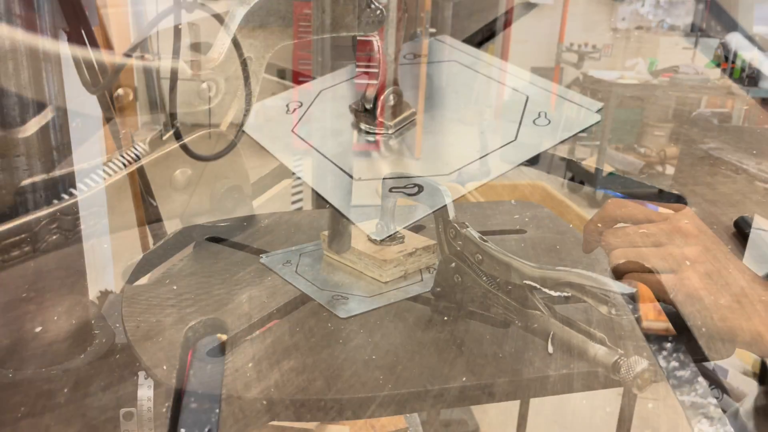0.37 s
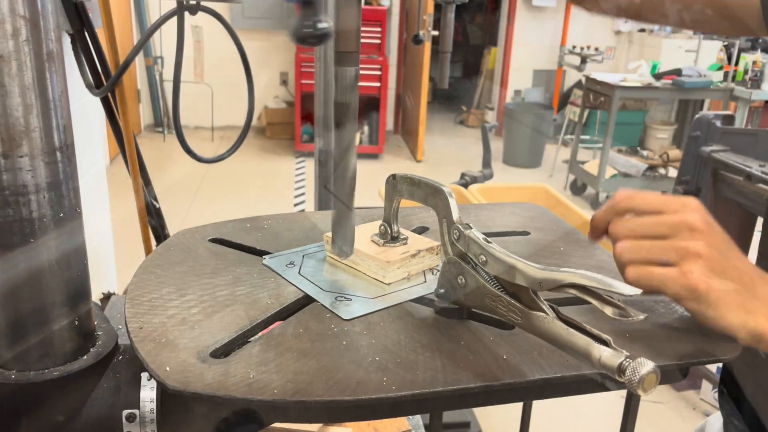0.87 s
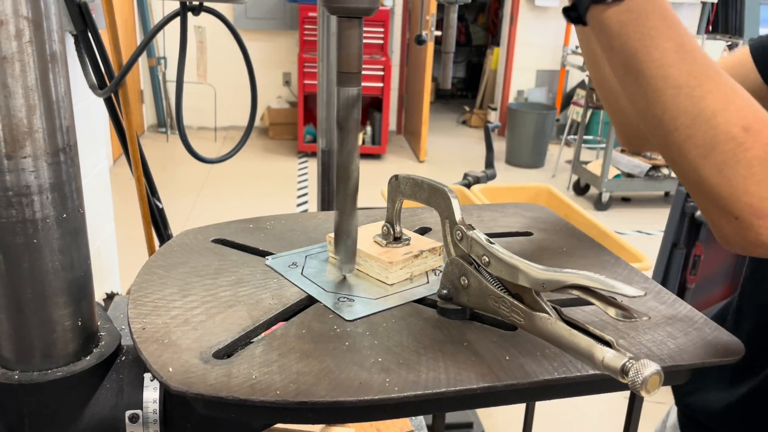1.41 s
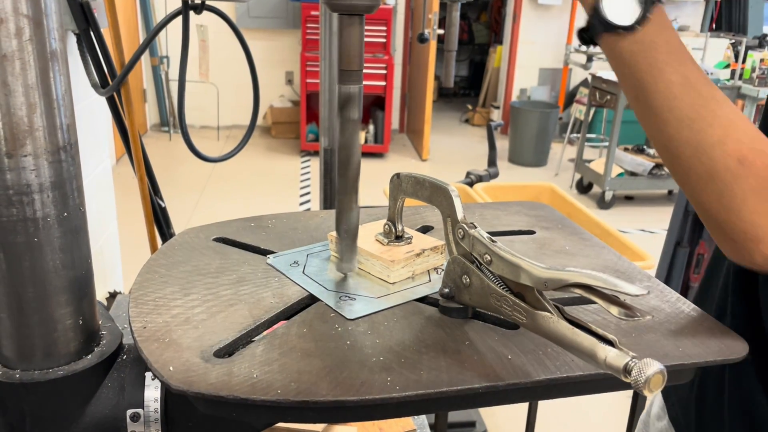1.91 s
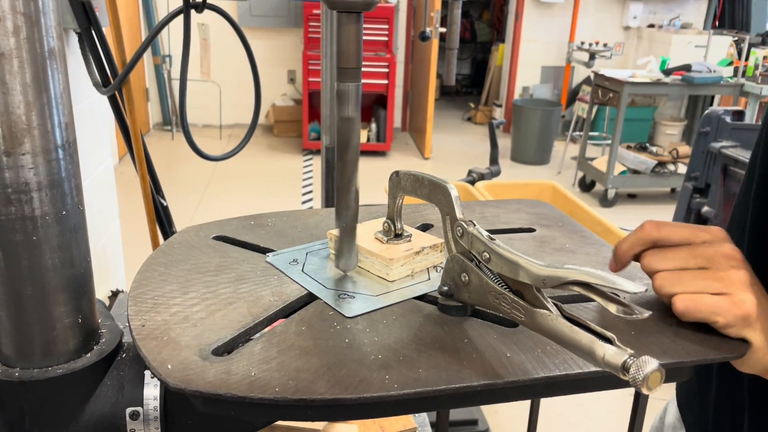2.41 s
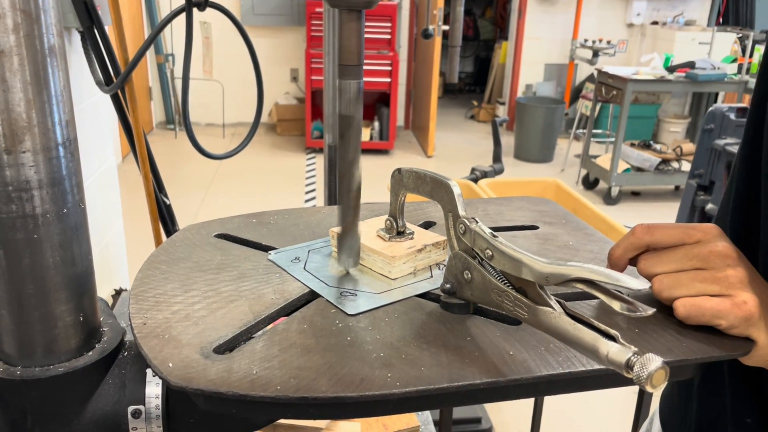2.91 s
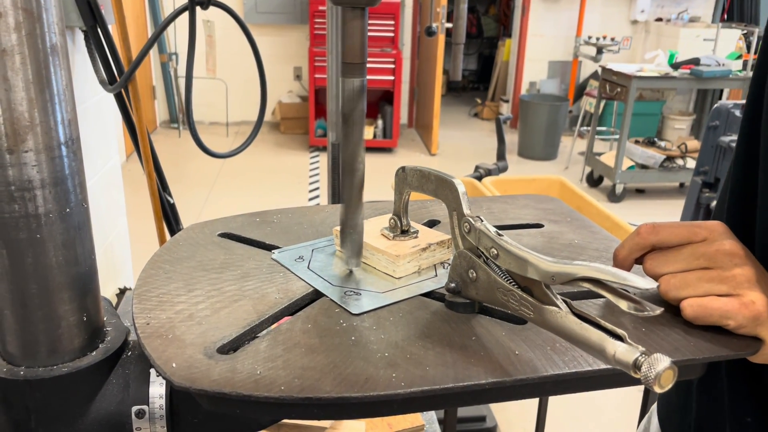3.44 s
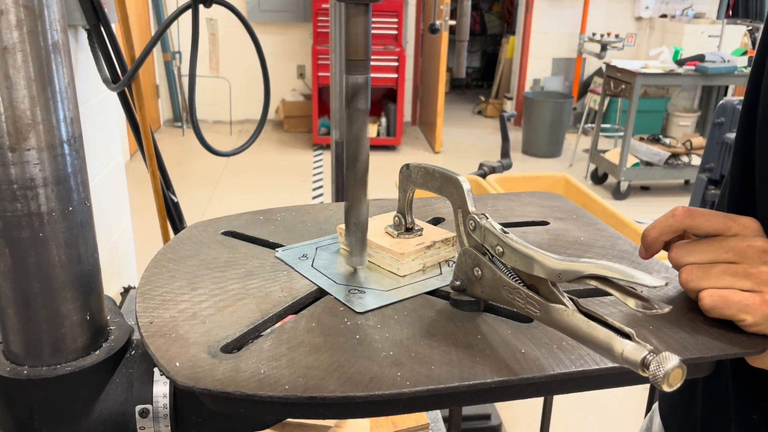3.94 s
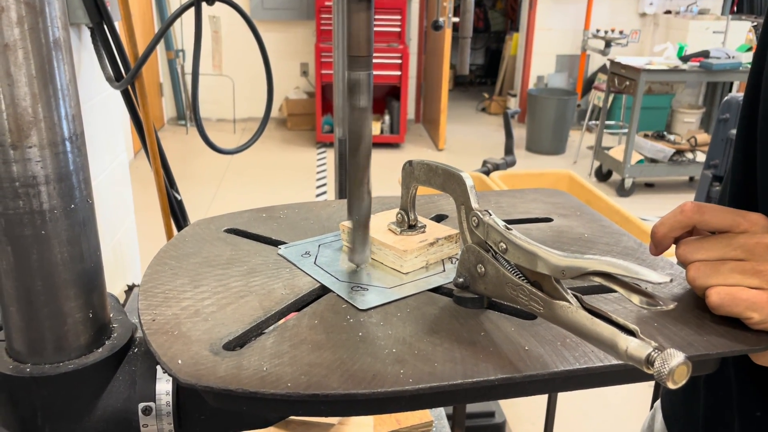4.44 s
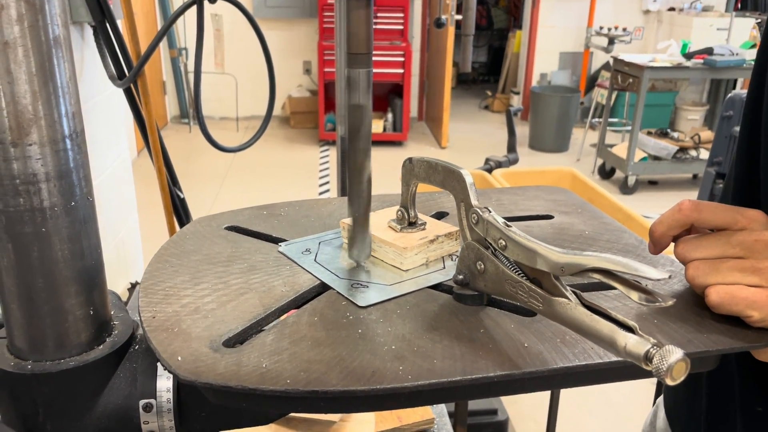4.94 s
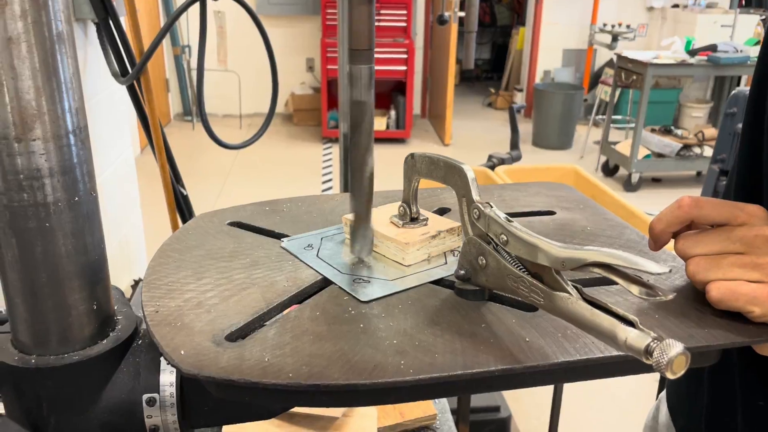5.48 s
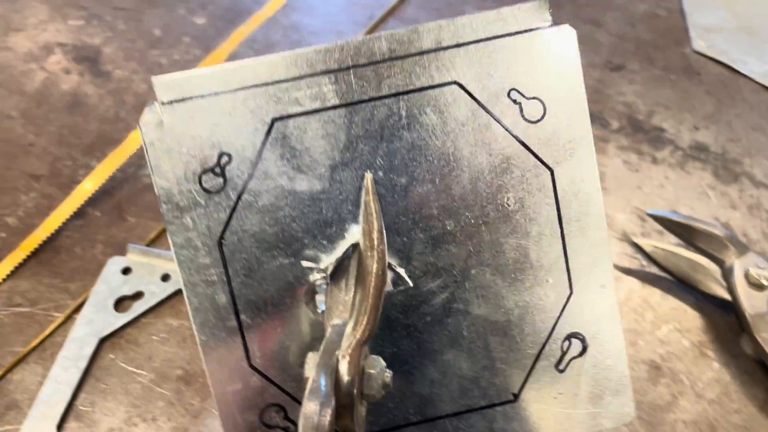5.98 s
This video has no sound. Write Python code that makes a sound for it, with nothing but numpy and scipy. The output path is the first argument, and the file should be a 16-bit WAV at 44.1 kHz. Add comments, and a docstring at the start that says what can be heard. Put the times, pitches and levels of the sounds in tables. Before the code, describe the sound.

A workshop drill press fades up, humming, rumbling and chattering through sheet steel, then cuts off short to a bright metallic scrape in a quiet room.

```python
"""In a workshop a drill press swells in, feeds a large bit into thin sheet metal and is cut off short.
The cast body and table resonate under noise, motor and drive sound as tones, a loose part buzzes by
impacts at the hum rate, and the bit chatters in bursts of band noise. At the start a clamp clanks twice
as decaying modes, among small ticks; at the end a metallic scrape, noise through moving resonances,
sounds in the quiet shop. Two close microphone ports receive it all."""
import sys
import numpy as np
from scipy import signal
from scipy.fft import rfft, irfft
from scipy.io import wavfile
from scipy.ndimage import uniform_filter1d

SR = 44100
rng = np.random.default_rng(int(sys.argv[2]) if len(sys.argv) > 2 else 0)


def wrap_up_sound(samples):
    """Save the sound to the file named by the first command line argument, as 16-bit audio."""
    columns = np.atleast_2d(samples).T
    # keep every value between -1 and 1, then stretch to whole-number steps
    tamed = np.clip(columns, -1, 1)
    steps = np.round(tamed * 32767).astype(np.int16)
    wavfile.write(sys.argv[1], SR, steps)


def ratio_of_db(decibels):
    """Turn decibels (scalar or array-like) into linear amplitude factors; 0 dB maps to 1."""
    return 10 ** (np.asarray(decibels, float) / 20)


N = 269010
TIME, HZ = np.arange(N) / SR, np.fft.rfftfreq(N, 1 / SR)

# Ventilation noise spectrum: f/Hz, relative level/dB
AIR_SPECTRUM = [(30, -20), (70, -2.5), (150, 1), (340, 1.5), (1000, -12), (1700, -15.5), (3100, -22),
                (4500, -28), (5500, -36), (8000, -33), (10000, -43), (15500, -50)]
# Decay of the shop's reverberation: band centre f/Hz, t60/s
ROOM_DECAY = [(500, 0.48), (2000, 0.54), (5000, 0.67), (10000, 0.11)]
# Small clicks and taps: t/s, relative level/dB, ring f/Hz, share of sharp click
TICKS = [(0.001, -30, 2400, 0.13), (.213, -41, 4900, .05), (0.256, -23, 1510, 0.06),
         (.307, -40, 3780, 0.12), (0.397, -24, 6140, .13), (.431, -42, 4200, 0.43),
         (0.473, -21.5, 5900, 0.1), (0.491, -29, 2440, .02), (.851, -34, 5800, .2),
         (0.8703, -22, 4670, 0.52), (.877, -33, 5800, .3), (1.008, -38, 6000, .6), (1.025, -40, 5800, .6),
         (1.018, -44, 6000, 0.65), (1.034, -37, 5500, .43), (1.057, -38, 7000, .6), (1.11, -39, 7000, .6),
         (1.755, -37, 7000, .6), (1.992, -36, 7500, .5), (2.092, -38.5, 9500, .6), (2.127, -36, 6300, 0.45),
         (2.342, -38, 5040, .6), (2.44, -42, 7000, .6), (2.585, -40, 9500, .5), (5.58, -47, 3900, .1),
         (5.65, -50, 4600, .15), (5.69, -44, 1200, .1), (5.71, -47, 4500, 0.36), (6.064, -28, 1140, .01)]
# Clamp blows: t/s, relative level/dB, factor on the ring time, delay until the grip damps it/s
CLAMP_BLOWS = [(.0092, -10, 0.96, 0.08), (0.3448, -12, 0.97, 0.066)]
# Clamp modes: f/Hz, t60/s before the blow's factor, level/dB in first blow, level/dB in second
CLAMP_MODES = [(1183, .05, -18, 6), (1285, 0.021, 10.5, -12), (1390, 0.017, -21, 22), (1700, 0.18, -24, 1),
               (1806, 0.056, -8, -8), (1960, 0.11, -9, -10), (2100, 0.099, -12, -9), (2300, .12, -18, -11),
               (2404, 0.14, 0.5, -4), (2515, 0.15, -7, -16), (2743, 0.15, -6, -23), (2780, 0.046, -5, 10),
               (2790, 0.058, -6, -25), (3160, 0.073, -0.5, 3.5), (3410, 0.079, -7, 3),
               (3620, 0.17, -15, -15), (3670, 0.073, -16, 8.5), (4012, 0.054, -5, 2.5),
               (4200, .1, -24, -22), (4339, 0.1, -16, -1), (4420, .05, -11, -3), (4720, 0.11, -14, -22),
               (5160, 0.07, -9, -22), (5280, 0.091, -18, -6), (5550, 0.069, -15, -7),
               (6580, 0.1, -17, -3.5), (7150, 0.06, -10, -0.5)]
# Scrape stroke: t/s, pressure level/dB, rasp f/Hz, which sinks with the speed
SCRAPE_STROKE = [(5.572, -70, 2450), (5.59, -61, 2450), (5.64, -67, 2450), (5.706, -62, 2450),
                 (5.714, -47, 2400), (5.745, -38.5, 2400), (5.76, -35, 2430), (5.785, -33, 2380),
                 (5.8, -35.5, 2300), (5.83, -33.5, 1950), (5.855, -37, 1840), (5.88, -43, 1850),
                 (5.92, -44, 1980), (6.02, -49, 2020), (6.035, -57, 2050), (6.1, -55, 2050)]
# Spectrum of metal sliding on metal: f/Hz, relative level/dB
SCRAPE_SPECTRUM = [(300, 2), (600, -3.5), (1100, -3), (1900, -2.5), (2600, -2.5), (3600, -2), (4600, -4),
                   (5600, -4.5), (8000, -11.5), (10500, -11.5), (12500, -16), (15500, -27)]
# Modes of the scraped thin sheet: f/Hz, width/Hz, relative level/dB
SHEET_MODES = [(820, 350, 2.5), (1244, 71, 2.5), (1800, 60, 1), (2060, 35, -1), (2210, 30, 1),
               (2490, 35, -3), (2640, 80, -3), (2910, 35, -3), (3110, 55, -1), (3780, 45, -11),
               (4620, 200, -3.5)]
# Spells of the loose part rattling: t/s, length/s, level/dB
BUZZ_SPELLS = [(1.253, .73, -49), (2.23, .02, -52), (2.275, .03, -51), (2.326, .05, -52), (2.43, .025, -50),
               (2.9, 0.027, -50)]
# Modes of the loose part: f/Hz, relative level/dB, t60/s
LOOSE_MODES = [(4120, -1, 0.0097), (4450, -5, 0.017), (5810, -6.5, 0.019), (7900, -1, 0.013),
               (9080, 1, 0.008), (10200, -9, .003), (10900, -1, 0.003), (11750, 2, 0.0051),
               (12400, 3, 0.003), (13700, -1, 0.0033), (15200, -16, .003)]
# Tones of rotor and belt drive: f/Hz, level/dB in light cutting
DRIVE_TONES = [(59.2, -57.5), (118.4, -47), (211, -40), (328.4, -40.5), (446.8, -49)]
# Rumble spectrum of belts and bearings: f/Hz, relative level/dB
RUMBLE_SPECTRUM = [(24, -43), (40, -35), (65, -12.5), (86, -17), (102, -4), (168, -7.5), (255, -6),
                   (319, -4), (345, -6.5), (450, -4.5), (470, -6.5), (584, -4.5), (695, -12), (916, -11),
                   (1070, -18.5), (1190, -14.5), (1650, -26.5), (2500, -39), (3250, -50), (5500, -120)]
# Resonances of head, column and table: f/Hz, width/Hz, level over the rumble/dB
CASTING_MODES = [(386, 8.6, 3), (405, 33, -5.5), (432, 17, -6), (585, 13.4, 0.5), (771, 12, 5.5),
                 (869, 8.7, 5.5), (921, 19, 6.5), (997.5, 21, 6.5), (1167, 24, 6.5), (1466, 25, 8.5),
                 (1888, 74, 13)]
# Table modes: free f/Hz, hard-pressed f/Hz, free width/Hz, relative level/dB
TABLE_MODES = [(104.6, 104, 11, -9), (167, 150, 43, -6), (209, 212, 6.5, 0.5), (220, 223, 10.2, 2),
               (277, 267, 8.9, -4), (298.5, 286, 16, -1), (327, 318.3, 19.6, -1.5)]
# Spectrum of the grinding bit: f/Hz, relative level/dB
GRIND_SPECTRUM = [(900, -0.5), (1700, 0.5), (2400, -3.5), (3100, -5), (4500, -9), (5500, -8), (7500, -13),
                  (9500, -13.5), (11000, -19), (13500, -24), (15500, -29)]
# Modes of the sheet under the bit: f/Hz, width/Hz, level over the grinding/dB
CLAMPED_MODES = [(2030, 21, 6), (2420, 12.4, 9), (2840, 9.6, 11.5), (3320, 16, 9.5), (4230, 18, 10),
                 (4555, 81, 5)]
# The bit catching an edge: t/s, relative level/dB, centre f/Hz
CATCHES = [(.572, -41, 1500), (0.7434, -26, 3300), (0.869, -25.5, 4080), (.972, -28, 2600),
           (1.028, -26, 3110), (1.138, -20.5, 2490), (1.2418, -24.5, 2860), (1.335, -31, 2800),
           (1.4073, -30, 2800), (1.433, -32, 2500), (1.476, -23.5, 2460), (1.5096, -21, 2400),
           (1.572, -25.5, 2500), (1.6085, -24, 2520), (1.6362, -28, 3300), (1.671, -25, 3040),
           (1.7445, -25, 3000), (1.799, -24, 2900), (1.877, -26.5, 2780), (2.012, -23, 2420),
           (2.046, -28, 3000), (2.118, -30, 2200), (2.244, -24, 2780), (2.27, -26.5, 2000),
           (2.3511, -39, 2500), (2.415, -26, 2300), (2.4745, -28, 2910), (2.5073, -27.5, 3450),
           (2.523, -24, 1900), (2.614, -20, 3150), (2.728, -35, 1500), (2.802, -21.5, 2290),
           (2.871, -30, 2400), (2.953, -29, 2000), (3.0535, -27, 2000), (3.111, -23, 2500),
           (3.1837, -24.5, 2000), (3.2574, -24, 2810), (3.3799, -23, 2810), (3.483, -28, 2900),
           (3.642, -34, 2000), (3.6926, -38, 2000), (3.746, -28, 1500), (3.762, -26, 1900),
           (3.808, -24, 3480), (4.024, -25, 2720), (4.097, -27, 2400), (4.4689, -26, 3070),
           (4.518, -21, 1700), (4.5606, -31, 1800), (4.595, -24.5, 1800), (4.725, -24, 2300),
           (4.8372, -30, 2400), (4.906, -25, 1500), (4.928, -31, 1700), (4.948, -21, 1700),
           (4.984, -25, 2300), (5.1203, -27, 2900), (5.2045, -18.5, 1700), (5.346, -18.5, 1700)]
# Hand on the feed lever: t/s, table load level/dB, bite level/dB, both against light cutting
FEED = [(.3, -3, 1), (.62, -2.5, -1.5), (.8, -6, 0.5), (1.5, 1, 0.5), (1.93, -3.5, -1), (2.05, 4, -1.5),
        (2.4, 2.5, 1.5), (2.65, -0.5, 0.5), (3.55, -2.5, -0.5), (3.75, 6, 4), (4.1, 3, 3), (4.5, 8, 3.5),
        (4.8, 3, 5), (5, 7.5, 4.5), (5.5, 6, 5)]
# Likeness of the two ports: f/Hz, share common to both
LIKENESS = [(30, 0.58), (100, 0.99), (340, 0.95), (1000, 0.78), (1700, 0.34), (2800, 0.44), (5200, 0.26),
            (5900, 0.71), (7300, 0.2), (7700, 1), (9050, 0.71), (9500, 0.096), (10500, 0.91), (16000, 0.75)]
# Phase of the right port against the left: f/Hz, half-turns
PORT_PHASE = [(0, 0), (1000, -.17), (1700, -.4), (2700, -.25), (4100, .1), (5000, -.1), (6000, .1),
              (7000, .55), (7600, 1), (9000, 1), (10400, 2), (12500, 2), (13600, 3), (22050, 3)]
# Left port over right port: f/Hz, level/dB
PORT_LEVEL = [(60, 1.1), (300, .7), (700, 2), (1700, 0), (4500, 3), (6500, 1), (7600, 0), (16000, 0)]

AIR_DB, MAINS_DB = (-39, -44.5), (-46.5, -48)  # before and after the press
SHOP_BACK_S, MAINS_UNDER_PRESS_DB = 0.018, -57  # rise time of the quiet shop after the cut
FADE_IN_S, FADE_IN_POWER = 0.8, 1.29
CUT_S = 5.509, 5.568  # the press sound fades out between these times
TICK_CYCLES, TICK_Q = 71, 4  # cycles down to -60 dB; sharpness of the noise band
BOUNCE_S, BOUNCE_DB = 0.0085, -15.5  # the jaws rebound once
CLATTER_DB, CLATTER_T60_S = -20, 0.06
GRIP_DB_PER_S, RISE_CYCLES = 900, 1.98  # extra decay once damped; build-up of a clamp mode
SLOW_HZ, SLOW_TREBLE_DB, TREBLE_DB_PER_OCTAVE = 1900, -6, 21.5  # a faster stroke is brighter
SQUEAL_DB, SQUEAL_RATIO = 1, 1.9  # upper rasp: level before the brightness, ratio to the lower
LINGER_HZ, LINGER_WIDTH_HZ, LINGER_DB = 2070, 16, 9.2  # longest-ringing mode of the sheet
HUM_HZ = 119.74
BUZZ_RISE_S, BUZZ_FALL_DB_PER_S = 0.019, 300
RUMBLE_DB, TABLE_DB, GRIND_DB, HUM_DB = -28, -30.5, -46, -34.5  # in light cutting
RUMBLE_PER_BITE, HUM_PER_LOAD, WHINE_PER_LOAD = 0.39, -0.17, 0.48  # dB for each dB of feed
WHINE_DRIFT_RAD, WHINE_WAVER_DB = 0.6, 2.0  # rms
HARD_LOAD_DB = 7  # here the pressed table modes have wholly replaced the free ones
CHATTER_PER_S, CHATTER_DB = 60, -4.5  # mean rate of small catches; level relative to GRIND_DB
CATCH_T60_S = 0.11
SHUDDER_PER_S, SHUDDER_DB = 24, 0.74  # the whole frame shudders together
EDGE_HZ = 15850  # nothing above this reaches the ports' output


def evened(x):
    """Normalisation: scales a signal to rms 1."""
    return x / np.sqrt(np.mean(x ** 2) + 1e-20)


def read(points):
    """Interpolation of a spectrum along a logarithmic frequency axis."""
    f, value = np.transpose(points)
    return np.interp(np.log(HZ + 1), np.log(f + 1), value)


def level(rows, column=1):
    """Envelope: a dB column as gain over time, held at its ends."""
    rows = np.transpose(rows)
    return ratio_of_db(np.interp(TIME, rows[0], rows[column]))


def peaks(modes):
    """Modal superposition: the power sum of resonance curves, as gain."""
    return np.sqrt(sum(ratio_of_db(db) ** 2 / (1 + (2 * (HZ - hz) / width) ** 2) ** 2
                       for hz, width, db in modes))


def coloured(x, gain):
    """Linear filtering in the frequency domain, normalised to rms 1."""
    return evened(irfft(rfft(x) * gain, N))


def wobble(per_s):
    """Low-pass noise: slow random variation up to the given rate."""
    return coloured(rng.standard_normal(N), 1 / (1 + (HZ / per_s) ** 4))


def rough_noise(per_s, depth_db):
    """Amplitude modulation: two unrelated noises share one fluttering level."""
    return rng.standard_normal((2, N)) * ratio_of_db(depth_db * wobble(per_s))


def ring(modes, size=9000):
    """Free vibration: the exponentially dying sines of a struck body."""
    t = TIME[:size]
    return sum(ratio_of_db(db - 60 * t / t60) * np.sin(2 * np.pi * hz * t + rng.uniform(0, 0.52))
               for hz, db, t60 in modes)


def glide(x, hz, width):
    """Heterodyne resonator: shifts a moving frequency to zero, smooths there and shifts back."""
    turn = np.exp(2j * np.pi * np.cumsum(hz) / SR)
    r = np.exp(-np.pi * width / SR)
    return 2 * (turn * signal.lfilter([1 - r], [1, -r], x / turn)).real


def add(mix, s, sound):
    """Superposition: adds a sound in place at a time in seconds."""
    part = mix[..., round(s * SR):][..., :sound.shape[-1]]
    part += sound[..., :part.shape[-1]]


def scattered(x, t60):
    """Scattering: a sound and its diffuse copy off nearby surfaces."""
    tail = rng.standard_normal(6000) * ratio_of_db(-60 * TIME[:6000] / t60)
    return np.array([x, signal.fftconvolve(x, tail / np.linalg.norm(tail))[:N]])


def reverberated(x):
    """Reverberation: two unrelated room tails, each band decaying at its own rate."""
    t, out = TIME[:SR // 2], np.zeros((2, N))
    for hz, t60 in ROOM_DECAY:
        band = signal.butter(N=2, Wn=[hz / 1.6, hz * 1.6], btype="band", fs=SR, output="sos")
        tail = signal.sosfilt(band, rng.standard_normal((2, len(t))))
        tail = tail * ratio_of_db(-60 * t / t60) * np.minimum(t / 0.0066, 1)
        out += signal.fftconvolve(x[None], tail, axes=1)[:, :N]
    return out / np.sqrt(SR / 40)


def faded_in():
    """Power-law envelope: 0 to 1 as the press swells in."""
    return np.minimum(TIME / FADE_IN_S, 1) ** FADE_IN_POWER


def shop():
    """Stationary background: broadband ventilation noise and mains hum with its second harmonic."""
    before = 1 - faded_in()
    after = np.clip((TIME - CUT_S[1]) / SHOP_BACK_S, 0, 1) ** 1.5
    air = coloured(rough_noise(30.0, 0.57), ratio_of_db(read(AIR_SPECTRUM)))
    air = air * (ratio_of_db(AIR_DB[0]) * before + ratio_of_db(AIR_DB[1]) * after)
    mains = ratio_of_db(MAINS_DB[0]) * before + ratio_of_db(MAINS_DB[1]) * after
    mains = mains + ratio_of_db(MAINS_UNDER_PRESS_DB) * (1 - before - after)
    # mains frequency is half the motor's hum
    tones = np.sin(np.pi * HUM_HZ * TIME) + 0.66 * np.sin(2 * np.pi * HUM_HZ * TIME)
    return air + mains * np.sqrt(2) * tones * ratio_of_db(1.6 * wobble(3.5))


def ticks():
    """Impulse excitation: each tick is a click, a puff of band noise and a brief ring."""
    mix, t = np.zeros(N), TIME[:3000]
    for s, db, hz, sharp in TICKS:
        t60, noise = TICK_CYCLES / hz, rng.standard_normal(len(t))
        click = np.convolve(noise, (0.75, .6, -0.092, -0.39), "same") * ratio_of_db(-60 * t / 0.019)
        puff = evened(signal.lfilter(*signal.iirpeak(hz, TICK_Q, SR), noise)) * ratio_of_db(-60 * t / t60)
        body = ring([(hz, 0, t60)], size=len(t))
        add(mix, s, ratio_of_db(db) * (sharp * click + 0.27 * puff + 0.28 * body))
    return mix


def clanks():
    """Modal impact: a struck clamp clatters, rings in many modes, rebounds and is damped by the grip."""
    mix, t, ring_t = np.zeros(N), TIME[:3000], TIME[:9000]
    treble_cut = 1 + (HZ / 7000) ** 2
    bass_cut = 1 + (1100 / (HZ + 1)) ** 6
    clatter = coloured(rng.standard_normal(N), ratio_of_db(read(SCRAPE_SPECTRUM)) / treble_cut / bass_cut)
    for blow, (s, db, damp, free_s) in enumerate(CLAMP_BLOWS):
        # loose jaws roughen each mode
        loose = rng.standard_normal((len(CLAMP_MODES), 9000))
        loose = evened(uniform_filter1d(loose, size=200, axis=1))
        clank = np.zeros(9000)
        for (hz, t60, *blow_db), rough in zip(CLAMP_MODES, loose):
            rise = np.minimum(ring_t * hz / RISE_CYCLES, 1)
            clank += ring([(hz, blow_db[blow], t60 * damp)]) * ratio_of_db(2.1 * rough) * rise
        clank = clank / abs(clank).max()
        clank = clank * ratio_of_db(-GRIP_DB_PER_S * np.maximum(ring_t - free_s, 0))
        for late, less_db in ((0, 0), (BOUNCE_S, BOUNCE_DB)):
            add(mix, s + late, ratio_of_db(db + less_db) * clank)
            fall = ratio_of_db(db + less_db + CLATTER_DB - 60 * t / CLATTER_T60_S)
            add(mix, s + late, fall * clatter[round((s + late) * SR):][:len(t)])
    return mix


def knocks():
    """Direct and reverberant field of clamp and ticks; close by, so alike at both ports."""
    mix = clanks() + ticks()
    near = 0.55 * mix + 0.58 * scattered(mix, 0.02)
    return near + ratio_of_db(-21) * reverberated(mix)


def scrape():
    """Frictional excitation: fine slips drive the sheet's modes; rasps and treble sink as steel slows."""
    sheet = ratio_of_db(read(SCRAPE_SPECTRUM)) * np.sqrt(1 + ratio_of_db(11.5) * peaks(SHEET_MODES) ** 2)
    sound = coloured(rough_noise(60, 1.6) * ratio_of_db(2.0 * wobble(900.0)), sheet)
    treble = irfft(rfft(sound) / (1 + (3000 / (HZ + 1)) ** 6), N)
    s, _, hz = np.transpose(SCRAPE_STROKE)
    hz = np.interp(TIME, s, hz)
    bright = ratio_of_db(SLOW_TREBLE_DB + TREBLE_DB_PER_OCTAVE * np.log2(hz / SLOW_HZ))
    uneven = hz * (1 + 0.041 * wobble(30.0))
    squeal = ratio_of_db(SQUEAL_DB) * bright ** 2 * glide(sound, SQUEAL_RATIO * uneven, 790)
    rasps = 2.1 * glide(sound, uneven, 350) + squeal
    stroke = level(SCRAPE_STROKE) * (TIME > s[0]) * (sound - treble + bright * treble + rasps)
    stroke = stroke + ratio_of_db(LINGER_DB) * glide(stroke, np.full(N, LINGER_HZ), LINGER_WIDTH_HZ)
    return stroke + ratio_of_db(-2.5) * reverberated(stroke[0])


def buzz():
    """Periodic impact: the loose part taps unevenly once in each hum cycle and rings."""
    taps = np.diff(np.floor(HUM_HZ * TIME + 0.018 * wobble(54.0)), prepend=0)
    taps = taps * ratio_of_db(2.1 * wobble(90.0) + 1.3 * wobble(12.0))
    rattle = signal.fftconvolve(abs(taps), ratio_of_db(-60 * TIME[:300] / 0.0067))[:N]
    rattle = rng.standard_normal(N) * rattle
    spells = np.zeros(N)
    for s, length, db in BUZZ_SPELLS:
        rise = np.clip((TIME - s) / BUZZ_RISE_S, 0, 1) ** 2
        spells += rise * ratio_of_db(db - BUZZ_FALL_DB_PER_S * np.maximum(TIME - s - length, 0))
    rung = evened(signal.fftconvolve(rattle, ring(LOOSE_MODES, size=900))[:N])
    return spells * scattered(rung, 0.09)


def whine():
    """Rotational tones of the drive, each drifting in phase and wavering in level."""
    tones = np.zeros(N)
    for hz, db in DRIVE_TONES:
        phase = 2 * np.pi * hz * TIME + WHINE_DRIFT_RAD * wobble(4.9)
        tones += ratio_of_db(db + WHINE_WAVER_DB * wobble(3.5)) * np.sin(phase)
    return np.sqrt(2) * level(FEED) ** WHINE_PER_LOAD * tones


def motor_hum():
    """Forced vibration: one motor tone, weaker under load, unsteady in phase and level."""
    tone = np.sin(2 * np.pi * HUM_HZ * TIME + 0.03 * wobble(6.3))
    hum = np.sqrt(2) * tone * ratio_of_db(0.82 * wobble(4.5))
    return ratio_of_db(HUM_DB) * level(FEED) ** HUM_PER_LOAD * hum


def casting():
    """Structural resonance: the spectrum of the rumble in the cast body."""
    return ratio_of_db(read(RUMBLE_SPECTRUM)) * np.sqrt(1 + peaks(CASTING_MODES) ** 2)


def rumble():
    """Structure-borne noise: belts and bearings through the casting, growing with the bite."""
    noise = coloured(rough_noise(16.5, 0.74), casting())
    return ratio_of_db(RUMBLE_DB) * level(FEED, column=2) ** RUMBLE_PER_BITE * noise


def table():
    """Boundary loading: free table modes give way to pressed ones as the feed grows."""
    free_modes = [(hz, width, db) for hz, _, width, db in TABLE_MODES]
    pressed_modes = [(hz, width * 1.47, db) for _, hz, width, db in TABLE_MODES]
    free = coloured(rough_noise(27, 0.17), peaks(free_modes))
    pressed = coloured(rough_noise(43, 1.8), peaks(pressed_modes))
    load = level(FEED)
    share = np.clip(uniform_filter1d(load, size=12000) / ratio_of_db(HARD_LOAD_DB), 0, 1) ** 2
    return load * ratio_of_db(TABLE_DB) * (np.sqrt(1 - share) * free + np.sqrt(share) * pressed)


def cutting():
    """Modal amplification: the spectrum of the bit cutting the clamped sheet."""
    return ratio_of_db(read(GRIND_SPECTRUM)) * np.sqrt(1 + peaks(CLAMPED_MODES) ** 2)


def chatter():
    """Random impulse process: small catches excite short rasps, each in its own band of the sheet."""
    size = ratio_of_db(1.3 * np.minimum(rng.exponential(1, N), 2.5)) * (rng.random(N) < CHATTER_PER_S / SR)
    patch, out, t = rng.integers(0, 6, N), np.zeros((2, N)), TIME[:4000]
    rasp = ratio_of_db(-60 * t / 0.097) * np.minimum(t / 0.00067, 1)
    for k, hz in enumerate(np.geomspace(1700, 4400, 6)):
        band = coloured(rng.standard_normal((2, N)), cutting() * peaks([(hz, 0.39 * hz, 0)]))
        out += band * signal.oaconvolve(size * (patch == k), rasp)[:N] * (2200 / hz) ** 0.31
    return evened(out)


def grinding():
    """Cutting noise: rough grinding with chatter, and a finer hiss in the treble."""
    high = 1 / (1 + (5000 / (HZ + 1)) ** 6)
    grind = ratio_of_db(2.5) * coloured(rough_noise(31, 1.2), cutting() * (1 - high))
    hiss = ratio_of_db(-7.5) * coloured(rough_noise(57, 1.0), cutting() * high)
    sound = grind + ratio_of_db(CHATTER_DB) * chatter() + hiss
    return ratio_of_db(GRIND_DB) * level(FEED, column=2) * sound


def catches():
    """Transient excitation: a caught edge bursts around its own pitch and jolts the casting."""
    t, mix = TIME[:6000], np.zeros((2, N))
    grind = coloured(rng.standard_normal((2, N)), cutting() * (1 + HZ / 9000))
    jolt_gain = casting() * (HZ / 1000) / (1 + HZ / 1000)
    jolt = coloured(rng.standard_normal((2, N)), jolt_gain)
    for s, db, hz in CATCHES:
        burst, thud = (x[:, round(s * SR):][:, :len(t)] for x in (grind, jolt))
        focus = signal.lfilter(*signal.iirpeak(hz, 2.5, SR), burst)
        envelope = ratio_of_db(db - 11.0 - 60 * t / CATCH_T60_S) * np.minimum(t / 0.0051, 1)
        add(mix, s, envelope * (0.35 * burst + 1.38 * focus + 2.76 * thud))
    return mix


def press():
    """Superposition of the machine: rumble, table and grinding share one shudder; tones stay apart."""
    shudder = ratio_of_db(SHUDDER_DB * wobble(SHUDDER_PER_S))
    return shudder * (rumble() + table() + grinding()) + motor_hum() + whine()


def scene():
    """Partial coherence: row 0 reaches both ports, row 1 is the diffuse part that differs at the right."""
    machine = faded_in() * press() + buzz() + catches()
    machine = machine * np.interp(TIME, CUT_S, (1, 0))
    shared, other = rfft(shop() + knocks() + scrape() + machine)
    same = np.clip(read(LIKENESS), 0, 1)
    return irfft([shared, same * shared + np.sqrt(1 - same ** 2) * other], N)


def low_pass(x):
    """Removes everything above the highest recorded frequency."""
    return signal.sosfilt(signal.butter(12, 16410, fs=SR, output="sos"), x)


def record(dry):
    """Two-port reception: band limiting, then level and phase differences between the ports."""
    left, right = rfft(dry) * (HZ < EDGE_HZ)
    f, half_turns = np.transpose(PORT_PHASE)
    phase = np.exp(1j * np.pi * np.interp(HZ, f, half_turns))
    tilt = ratio_of_db(read(PORT_LEVEL) / 2)
    return low_pass(irfft([left * tilt, right * phase / tilt], N))


dry = scene()
out = record(dry)
wrap_up_sound(out)
```